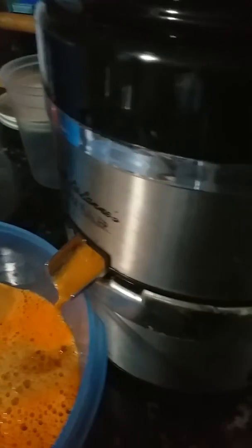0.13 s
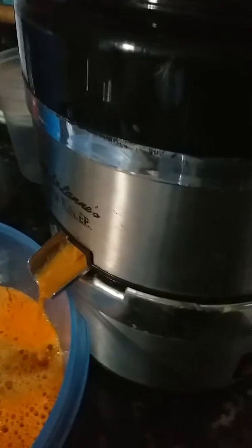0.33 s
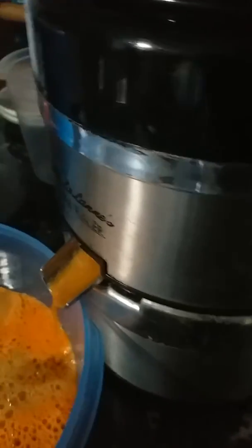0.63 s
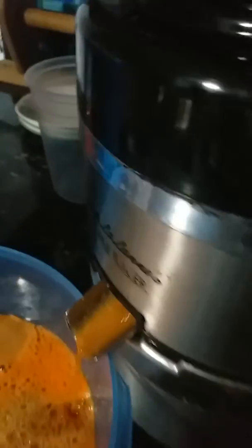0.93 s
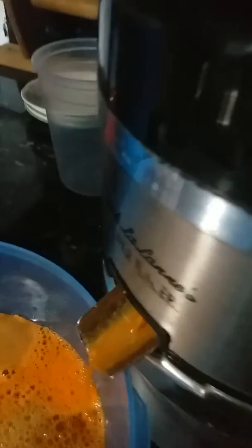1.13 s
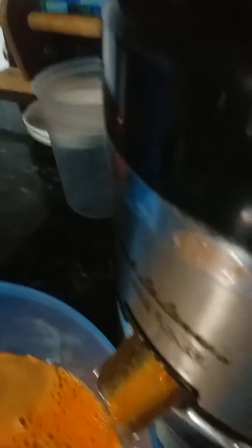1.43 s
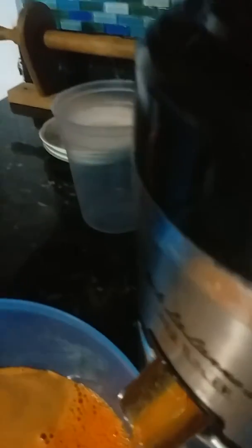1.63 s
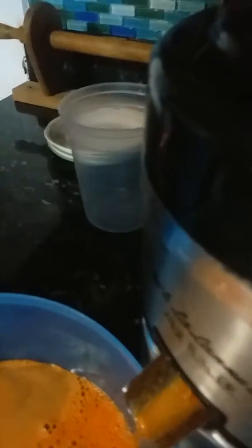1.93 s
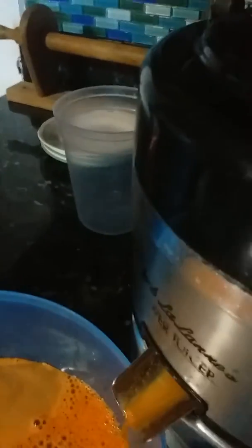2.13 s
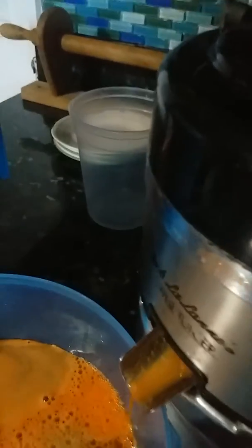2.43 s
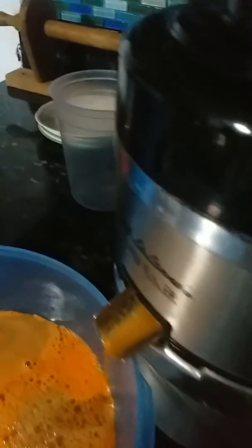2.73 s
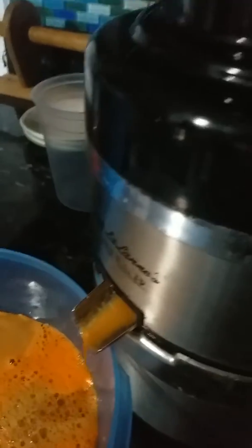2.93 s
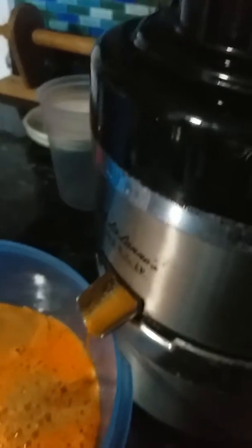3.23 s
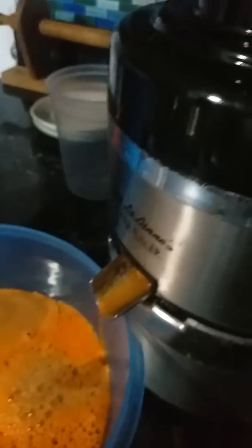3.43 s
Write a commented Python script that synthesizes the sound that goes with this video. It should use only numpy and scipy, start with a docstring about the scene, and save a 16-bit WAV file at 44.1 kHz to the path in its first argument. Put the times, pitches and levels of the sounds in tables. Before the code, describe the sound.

Electric juicer whirring steadily up close while pieces of produce knock, crack and shred inside

```python
"""A motor hums and whines over the rush of a spinning basket: a centrifugal juicer on a kitchen counter,
close to the microphone. Steady sines make the motor, coloured noise the basket and the rumbling bowl.
Pieces of produce knock about in the plastic housing (decaying sines) and are shredded in gritty noise bursts.
After the last big piece, wet pulp sprays and splats; quick reflections and a short room tail follow each hit."""
import sys
import numpy as np
from scipy import signal
from scipy.fft import rfft, irfft
from scipy.io import wavfile
from scipy.ndimage import uniform_filter1d

SR = 44100
rng = np.random.default_rng(int(sys.argv[2]) if len(sys.argv) > 2 else 0)


def transcribe(u):
    """Save the signal u as a 16-bit wav file named by the first command-line argument.

    u: samples, shape (n,) or (channels, n), limited to [-1, 1]; the rate is SR.
    q: integer samples, one column per channel.
    """
    v = np.clip(np.atleast_2d(u).T, -1, 1)
    q = np.round(v * 32767).astype(np.int16)
    wavfile.write(sys.argv[1], SR, q)


N = 158760
T = np.arange(N) / SR
HZ = np.fft.rfftfreq(N, 1 / SR)
BURST_T = T[:SR // 6]  # time axis of one short hit
ATTACK_S = 0.00011  # onset of hard hits

# level of the bowl rumbling under load: time_s, level_db
LOAD_LEVEL = [(0, -37.5), (.22, -30.5), (.55, -34), (1.05, -38), (1.28, -34.5), (1.55, -41), (2.6, -47.5),
              (2.95, -37), (3.17, -21.5), (3.28, -32.5), (3.46, -30.5), (3.55, -28.5), (3.6, -31)]
# colour of cracking and rubbing produce: frequency_hz, relative_level_db
CRACK_COLOUR = [(200, -74.5), (600, 2), (1000, 7), (1300, -1), (1700, 4), (2300, 0), (3000, 1), (4200, -1),
                (6000, -10), (9000, -58), (16000, -39)]
# colour of the bright fizz of tearing: frequency_hz, relative_level_db
FIZZ_COLOUR = [(1500, -30), (4000, -4), (6000, -1), (8000, -1), (9500, -10), (13000, -16), (16000, -25)]


def amp(db):
    """Decibels to gain."""
    return 10 ** (np.asarray(db) / 20)


def evened(x):
    """Scales to unit rms."""
    return x / np.sqrt(np.mean(abs(x) ** 2) + 1e-20)


def read(points, hz=HZ):
    """Reads a table along log frequency."""
    f, value = np.transpose(points)
    return np.interp(np.log(hz + 1), np.log(f + 1), value)


def level(points):
    """Gain over time from (s, dB) points."""
    return amp(np.interp(T, *np.transpose(points)))


def add(mix, s, sound):
    """Mixes a sound in at time s, cut off at the end of the mix."""
    part = mix[..., max(round(s * SR), 0):][..., :sound.shape[-1]]
    part += sound[..., :part.shape[-1]]


def drift(rate_hz):
    """Slow random motion of unit rms: noise kept mostly below rate_hz."""
    spectrum = rfft(rng.standard_normal(N))
    return evened(irfft(spectrum / (1 + (HZ / rate_hz) ** 4), N))


def ports(pair, spectrum):
    """Colours two unrelated signals causally, at unit power gain, and blends them into two microphone ports."""
    # likeness of the ports: frequency_hz, likeness (0-1)
    likeness = [(350, 0.92), (600, 0.57), (1000, 0.18), (2500, 0.42), (14000, .2)]
    # balance of the ports: frequency_hz, left_minus_right_db
    balance = [(100, 1.5), (300, -3.5), (900, -1.5), (1300, 4), (2300, 2.5), (4200, -1), (6500, -2.5),
               (8000, 2.5), (12000, 2)]
    # phase by which left leads right: frequency_hz, lead_rad
    lead = [(100, -0.5), (600, 0.37), (1000, 2), (1450, 7), (2400, 6), (3100, 3.5), (4200, 7.5)]
    # folding the cepstrum forward gives the colour its minimum phase
    cepstrum = irfft(np.log(evened(amp(read(spectrum)))), N)
    fold = np.r_[1, np.full(N // 2 - 1, 2), np.zeros(N - N // 2)]
    a, b = rfft(pair) * np.exp(rfft(cepstrum * fold))
    same = np.clip(read(likeness), 0, 1)
    side = amp(read(balance) / 2)
    left = a * side
    blend = same * a + np.sqrt(1 - same ** 2) * b
    right = blend * np.exp(-1j * read(lead)) / side
    return irfft(np.array([left, right]), N)


def tone(hz, pan_db, unsteady):
    """One tone of the machine, wobbling in phase and fluttering in strength; pan_db is left minus right."""
    waver_hz, flutter_db, wobble_rad = 8.3, 3.5, 1.09  # flutter and wobble at unsteady = 1
    wobble = unsteady * wobble_rad * drift(waver_hz)
    wave = np.sin(2 * np.pi * (hz * T + rng.random()) + wobble)
    flutter = amp(unsteady * flutter_db * drift(waver_hz))
    return amp([[pan_db / 2], [-pan_db / 2]]) * evened(wave * flutter)


def motor():
    """Steady tones, a whine that swells and fades, and a thin whistle that sinks as the load grows."""
    # steady tones of the running machine: pitch_hz, level_db, left_minus_right_db, unsteadiness (0-1)
    steady_tones = [(61.6, -54, -3, 0.3), (136.2, -36.5, 0, 0.22), (286.3, -46.5, 1, 1),
                    (341.3, -51, -2, 1), (629, -52, 8.5, 0.64), (888.6, -52, 4, 1),
                    (1860, -61.5, -25, 0.46)]
    # main whine: time_s, level_db
    whine_level = [(0, -38), (.6, -35.5), (1.7, -39.5), (2.6, -40), (3, -36.5), (3.6, -39)]
    whistle_base_db, load_follow = -60.5, -0.21  # exponent on the load gain, which sits below 1
    hum = sum(amp(db) * tone(hz, pan_db, unsteady) for hz, db, pan_db, unsteady in steady_tones)
    whistle_gain = amp(whistle_base_db) * level(LOAD_LEVEL) ** load_follow
    whistle = whistle_gain * tone(2742, pan_db=-11.5, unsteady=0.98)
    whine = level(whine_level) * tone(839, pan_db=-11.5, unsteady=0.36)
    return hum + whistle + whine


def basket():
    """Air rushes through the spinning mesh in drifting patches; the loaded bowl rumbles in uneven lumps."""
    # colour of the rush: frequency_hz, relative_level_db
    rush_colour = [(62, -18), (100, -1.5), (150, 2.5), (215, -3.5), (300, 4), (400, -5.5), (520, -5.5),
                   (660, -12.5), (790, -7.5), (1000, 0.5), (1200, -10), (1750, -9), (2300, -20.5),
                   (2900, -10.5), (7000, -16.5), (8100, -12), (9400, -24), (15500, -30.5)]
    # rush over time, on top of its base level: time_s, gain_db
    rush_level = [(0, 5), (1.2, 3.5), (1.8, 2), (3.6, 1.5)]
    # colour of the bowl's rumble: frequency_hz, relative_level_db
    rumble_colour = [(30, -31), (70, -29), (130, -6.5), (195, -3), (235, -2), (320, 0), (420, -5.5),
                     (520, -11), (640, -4.5), (4000, -67)]
    rush_base_db, patch_db, swirl_db, lump_db = -38.5, 2, 0.5, 2.5
    z = signal.stft(rng.standard_normal((2, N)), nperseg=512)[2]
    # noise smoothed over frequency and time, shared by both signals
    patches = rng.standard_normal(z.shape[1:])
    patches = uniform_filter1d(patches, size=7, axis=0)
    patches = evened(uniform_filter1d(patches, size=7, axis=1))
    patchy = signal.istft(z * amp(patch_db * patches), nperseg=512)[1][:, :N]
    air = evened(patchy * amp(swirl_db * drift(120)))
    lumps = evened(rng.standard_normal((2, N)) * amp(lump_db * drift(45)))
    rush = amp(rush_base_db) * level(rush_level) * ports(air, rush_colour)
    return rush + level(LOAD_LEVEL) * ports(lumps, rumble_colour)


def scrape(length, rise, grain_db=4):
    """A gritty noise burst that rises, then dies away to about 1/e at twice its length."""
    t = BURST_T
    shape = (1 - np.exp(-t / rise)) * np.exp(-(t / (2 * length)) ** 1.36)
    coarse = t[::30]
    unevenness = np.interp(t, coarse, rng.standard_normal(len(coarse)))
    grit = rng.standard_normal((2, len(t))) * amp(grain_db * unevenness)
    return evened(grit * shape) * np.sqrt(np.mean(shape ** 2))


def lid(t):
    """The lid's modes, each detuned slightly at random on every hit, each in its own phase at the two ports."""
    # modes of the plastic lid: pitch_hz, level_db, t60_s
    modes = [(1000, -9.5, 0.011), (1540, -5, 0.0085), (3040, -1.5, 0.0073), (4325, -7, 0.014)]
    spread = 0.039  # relative detuning
    hz, db, t60 = np.transpose(modes)[:, :, None]
    detuned_hz = hz * (1 + spread * rng.uniform(-0.82, 1, hz.shape))
    turns = detuned_hz * t + rng.random((2, len(modes), 1))
    ringing = amp(db - 60 * t / t60) * np.sin(2 * np.pi * turns)
    return ringing.sum(1) * (1 - np.exp(-t / ATTACK_S))


def knocks():
    """Each piece snaps at the lid (softer the longer it scrapes), thuds, chatters and is torn by the grater."""
    # pieces hitting the housing, levels before the gains below:
    # start_s, scrape_length_s, thud_db, thud_pitch_hz, crack_db, fizz_db
    pieces = [(0.0445, 0.01, -13.5, 453, -19.5, -33), (0.172, 0.0029, -10.5, 478, -19, -30),
              (0.21, 0.0027, -20, 400, -18, -23.5), (0.24, 0.024, -22, 482, -29.5, -39),
              (0.28, 0.0025, -11, 483, -25.5, -29), (0.288, 0.0051, -11, 457, -22.5, -37),
              (0.4029, 0.0012, -27.5, 570, -14, -25.5), (.453, 0.0016, -22, 367, -28.5, -25.5),
              (0.661, 0.0012, -6.5, 466, -15, -20.5), (0.673, 0.0086, -21.5, 433, -27.5, -39),
              (0.682, 0.0046, -11, 455, -46, -44), (0.772, 0.0031, -25, 485, -48, -52),
              (1.2194, 0.0074, -13, 424, -27, -38.5), (1.6485, 0.003, -41, 700, -13.5, -31),
              (1.6735, 0.0035, -16.5, 290, -19.5, -27), (1.685, 0.006, -12, 265, -27.5, -30),
              (2.356, 0.0018, -18.5, 250, -43, -54), (3.077, 0.0062, -9.5, 317, -14.5, -21),
              (3.087, 0.0068, -5.5, 283, -22, -36), (3.1, 0.0083, -9, 290, -29, -33),
              (3.343, .003, -18, 280, -52, -42), (3.427, 0.0047, -18.5, 326, -54, -26)]
    # colour of the housing's dull body noise: frequency_hz, relative_level_db
    body_colour = [(40, -55), (100, -8), (200, -2), (400, -1), (650, 0), (1100, -10), (2000, -32),
                   (9000, -80)]
    ring_s = 0.019  # t60 of the housing
    push = 0.35  # thud rise time over scrape length
    bounce, body_db = 0.45, -8
    snap_db, softening_db_per_s = 5.5, 700
    thud, body, crack, fizz = np.zeros((4, 2, N))
    t = BURST_T
    for s, length, thud_db, hz, crack_db, fizz_db in pieces:
        wave = np.sin(2 * np.pi * hz * t)
        ring = wave * amp(-60 * t / ring_s)
        chatter = signal.fftconvolve(scrape(length, ATTACK_S)[0], ring)[:len(t)]
        blow = wave * amp(-60 * t / (ring_s + 4 * length)) * (1 - np.exp(-t / (push * length)))
        add(thud, s, amp(thud_db) * (2 * blow + bounce * evened(chatter) * np.std(blow)))
        add(thud, s, amp(crack_db + snap_db - softening_db_per_s * length) * lid(t))
        add(body, s, amp(thud_db + body_db) * scrape(length, ATTACK_S))
        add(crack, s, amp(crack_db) * scrape(length, ATTACK_S))
        add(fizz, s, amp(fizz_db) * scrape(length, ATTACK_S))
    return thud + ports(body, body_colour) + ports(crack, CRACK_COLOUR) + ports(fizz, FIZZ_COLOUR)


def kitchen(x):
    """Quick reflections from housing and counter, then a short tiled-room tail, as decaying noise echoes."""
    # decay of the room: frequency_hz, t60_s
    room_decay = [(100, 0.48), (600, 0.28), (8000, 0.33)]
    # colour of the echoes: frequency_hz, relative_level_db
    echo_colour = [(550, -12), (1200, 0.5), (10000, -8.5)]
    room_db, near_db, near_decay_s = -11.5, -5, 0.0029
    hz, t, z = signal.stft(rng.standard_normal((2, N)), SR, nperseg=256)
    fading = z * amp(-60 * t / read(room_decay, hz)[:, None])
    tail = signal.istft(fading, SR, nperseg=256)[1][:, :N] * (T > 0.006)
    near = rng.standard_normal((2, N)) * np.exp(-T / near_decay_s) * (T > 0.001)
    echo = amp(room_db) * tail / np.linalg.norm(tail[0]) + amp(near_db) * near / np.linalg.norm(near[0])
    echo = ports(echo, echo_colour)[:, :SR // 2]
    return x + signal.fftconvolve(x, echo, axes=1)[:, :N]


def grains():
    """Tiny impacts of uneven size at random moments, at unit rms."""
    per_s, spread_db = 1800, 4.5
    struck = rng.random(N) < per_s / SR
    size = amp(spread_db * np.minimum(rng.exponential(1, N), 4)) * struck
    return evened(size * rng.standard_normal((2, N)))


def shreds():
    """Small wet pieces swish over the mesh, each with a falling squelch, over a rattle that follows the load."""
    # small wet shreds dragged over the mesh: start_s, length_s, level_db
    wet_pieces = [(0.134, 0.0092, -24), (0.478, 0.0048, -25), (0.596, 0.017, -27), (0.85, 0.0061, -29.5),
                  (0.939, 0.01, -22), (0.98, 0.0039, -22.5), (1.138, 0.0039, -29), (1.288, 0.0054, -24.5),
                  (1.348, 0.0056, -26), (1.844, 0.011, -30), (1.998, 0.0071, -27.5), (2.046, 0.011, -32),
                  (2.252, 0.0051, -26.5), (2.381, 0.012, -31), (2.608, 0.0062, -31), (2.722, 0.0091, -34),
                  (2.757, 0.0063, -26), (2.947, 0.019, -29), (3.013, 0.019, -24.5), (3.044, 0.0069, -28)]
    rise_s, fizz_db = 0.0064, -11.5
    rattle_base_db, load_follow = -25, 0.53  # exponent on the load gain
    start_hz, end_hz, fall_s, width_hz, squelch_db = 2030, 860, 0.0061, 170, -4.5
    swish = amp(rattle_base_db) * level(LOAD_LEVEL) ** load_follow * grains()
    squelch = np.zeros((2, N))
    pole = np.exp(-np.pi * width_hz / SR)
    pitch_hz = end_hz + (start_hz - end_hz) * np.exp(-BURST_T / fall_s)
    turn = np.exp(2j * np.pi * np.cumsum(pitch_hz) / SR)
    for s, length, db in wet_pieces:
        rub = amp(db) * scrape(length, rise_s)
        add(swish, s, rub)
        # a resonance that glides: shift down by the pitch, smooth, shift back up
        smooth = signal.lfilter([1], [1, -pole], rub / turn)
        add(squelch, s, amp(squelch_db) * np.std(rub) * evened((turn * smooth).real))
    return ports(swish, CRACK_COLOUR) + amp(fizz_db) * ports(swish, FIZZ_COLOUR) + squelch


def drip():
    """A drop of juice falls into the bowl: one small bubble rings, half as strong on the right."""
    start_s, hz, peak_db, decay_s = 2.874, 1340, -28, 0.0025
    t = np.maximum(T - start_s, 0)
    envelope = np.e * t / decay_s * np.exp(-t / decay_s)  # peaks at 1
    return amp(peak_db) * envelope * np.sin(2 * np.pi * hz * t) * np.array([[1], [0.5]])


def pulp():
    """Wet pulp sprays as many tiny impacts and splats on the lid in soft-edged noise bursts."""
    # spray: time_s, level_db
    spray_level = [(2.9, -75), (3.05, -50), (3.2, -34), (3.4, -58), (3.47, -41), (3.6, -52)]
    # wet pulp flung at the lid: start_s, length_s, level_db
    splats = [(3.16, 0.0028, -13.5), (3.201, 0.0095, -23.5), (3.288, 0.0043, -26.5), (3.33, 0.0082, -27),
              (3.419, 0.0064, -25.5), (3.527, 0.016, -35.5)]
    # colour of the wet noise: frequency_hz, relative_level_db
    wet_colour = [(300, 2.5), (1500, -6.5), (5500, -5), (7800, 0.5), (9500, -11.5), (12000, -8),
                  (16000, -17.5)]
    rise_s, left_db = 0.0017, 3  # left_db: extra left minus right
    wet = level(spray_level) * grains()
    for s, length, db in splats:
        add(wet, s, amp(db) * scrape(length, rise_s))
    return ports(wet, wet_colour) * amp([[left_db / 2], [-left_db / 2]])


def scene():
    """The running machine and what it chews; only the hits, rubs, spray and drip excite the kitchen."""
    return motor() + basket() + kitchen(knocks() + shreds() + pulp() + drip())


def record(dry):
    """The microphone's bass roll-off, the full-scale limit, then the band limit."""
    low_cut_hz, edge_hz = 58, 15900
    bass_cut = signal.butter(2, low_cut_hz, "high", fs=SR, output="sos")
    limited = np.clip(signal.sosfilt(bass_cut, dry), -1, 1)
    band = signal.firwin(401, edge_hz, window=("kaiser", 9), fs=SR)
    return signal.oaconvolve(limited, band[None], "same")


dry = scene()
out = record(dry)
transcribe(out)
```